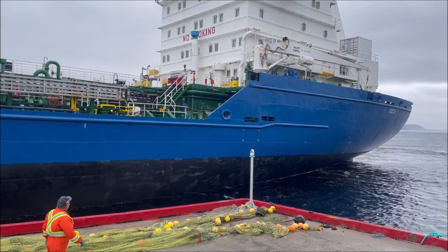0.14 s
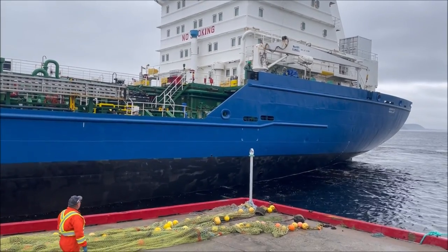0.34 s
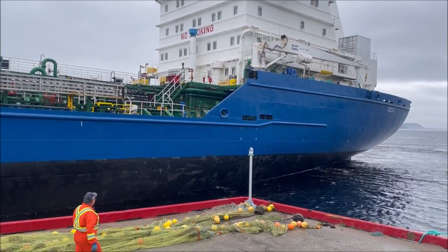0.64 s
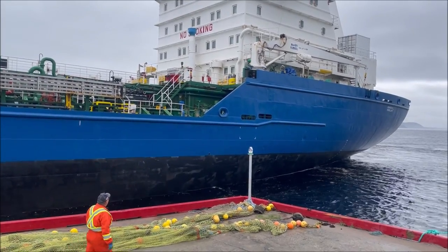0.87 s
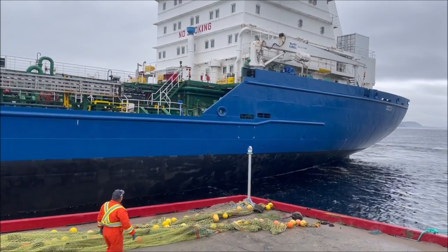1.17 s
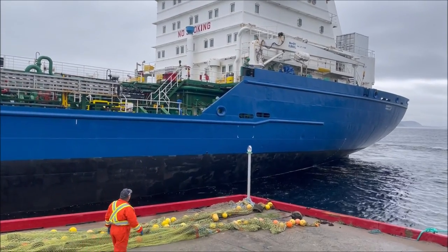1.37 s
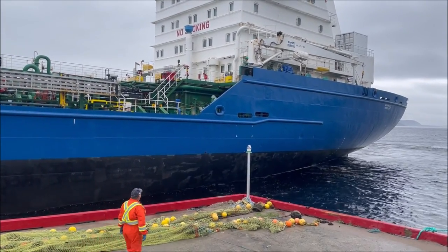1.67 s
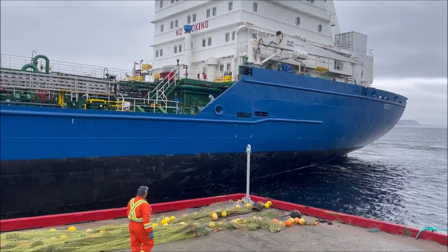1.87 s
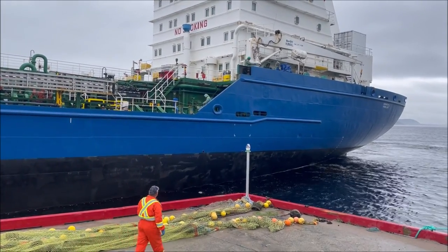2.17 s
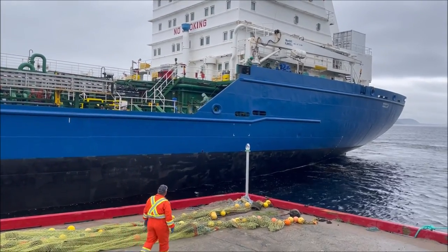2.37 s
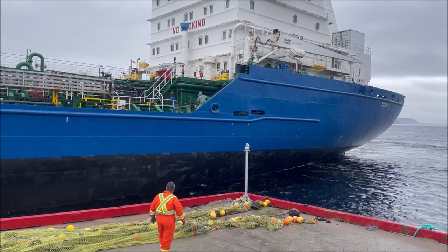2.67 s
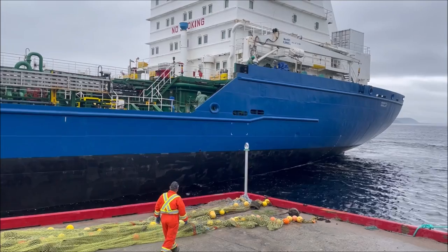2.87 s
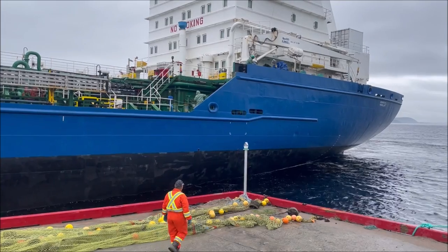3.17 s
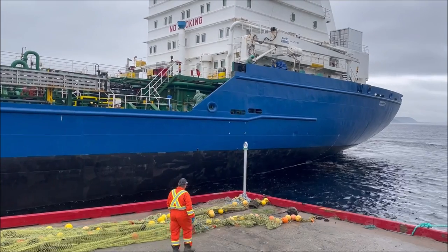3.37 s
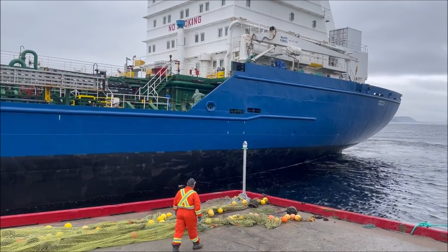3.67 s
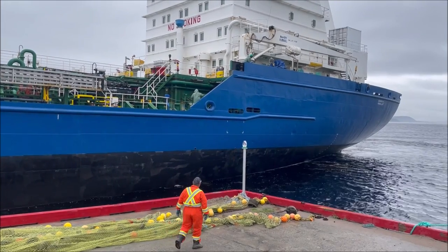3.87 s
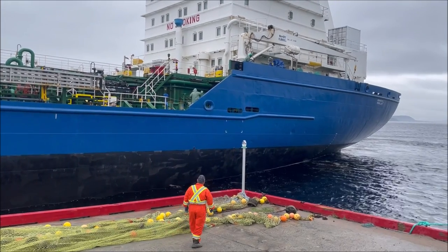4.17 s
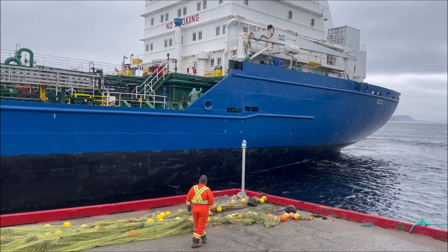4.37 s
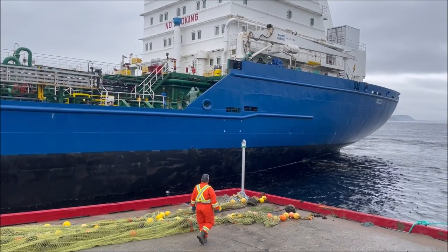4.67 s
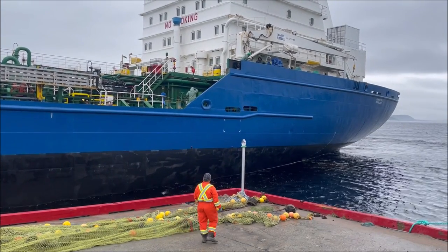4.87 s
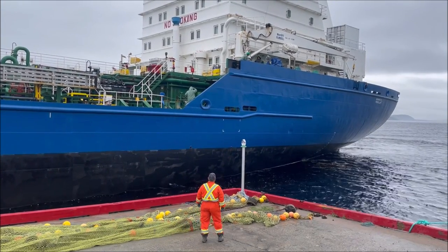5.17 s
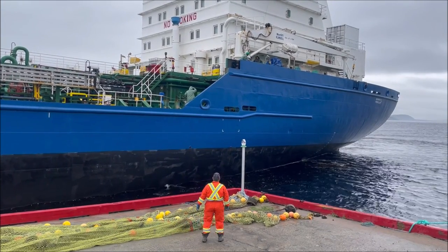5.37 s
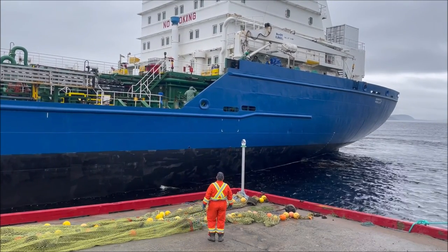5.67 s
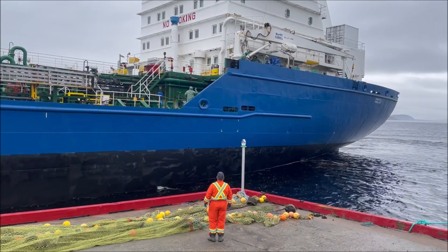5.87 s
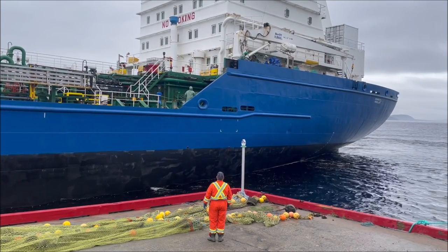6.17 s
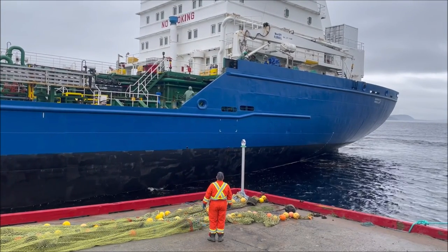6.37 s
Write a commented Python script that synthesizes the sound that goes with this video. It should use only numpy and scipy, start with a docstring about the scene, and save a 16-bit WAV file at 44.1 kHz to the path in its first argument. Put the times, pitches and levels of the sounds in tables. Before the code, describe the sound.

A tanker lying at a wharf drones without pause. A low diesel throb and deep exhaust rumble sit under a hollow, wavering boom from the ventilation shaft, broad fan roar and pump hums. A softer blower whirr, a faint fan whine and thin hiss lie on top. Small wind puffs thud at the stereo microphone, clearest just after the middle. Open air, no footsteps or voices.

```python
"""A four-stroke diesel throbs through the funnel of a tanker lying at a wharf, over a deep rumble of exhaust.
Engine-room fans boom in their trunking and roar from the louvres, while pumps hum and deck blowers whirr.
A thin hiss drifts on a light breeze, and puffs of wind buffet the two microphone ports.
Hums and notes are sine waves; moving air is coloured noise. Sound bouncing off hull, water and quay
reaches the ports by unequal paths, so the two sides differ in level, timing and likeness."""
import sys
import numpy as np
from scipy import signal
from scipy.fft import rfft, irfft, next_fast_len
from scipy.io import wavfile
from scipy.ndimage import uniform_filter1d, minimum_filter1d, map_coordinates

SR = 44100
rng = np.random.default_rng(int(sys.argv[2]) if len(sys.argv) > 2 else 0)


def wav_record(signal):
    """Record a signal, one row per channel, as 16-bit PCM in the file named by sys.argv[1]."""
    frames = np.transpose(np.atleast_2d(signal))
    bounded = np.clip(frames, -1, 1)
    # unit amplitude maps onto the largest positive 16-bit level
    quanta = np.round(bounded * 32767).astype(np.int16)
    wavfile.write(sys.argv[1], SR, quanta)


N = 287532

CYCLE_HZ = 6.043  # working cycles of the diesel a second, two shaft turns each

# How the diesel and its exhaust rise and fall. Each row: time in seconds, change of level in dB.
ENGINE_LOAD = [(0, -0.65), (.8, 0.38), (1.3, -1.9), (2.3, 0.27), (3.3, 0.77), (3.7, -0.13), (5.2, 0.064),
               (6.5, 0.81)]


def amp(db):
    """Turn decibels into a plain gain."""
    return 10 ** (np.asarray(db) / 20)


def along(points, hz):
    """Read a value at any frequency from (Hz, value) points, with frequency on a log axis."""
    f, v = np.transpose(points)
    return np.interp(np.log(hz + 1), np.log(f + 1), v)


def curve(rows):
    """Join (seconds, value) points by straight lines, giving one value per sample."""
    return np.interp(np.arange(N) / SR, *np.transpose(rows))


def wobble(rate):
    """Draw a smooth random curve through `rate` random points a second."""
    knots = rng.standard_normal(int(N * rate / SR) + 4)
    return map_coordinates(knots, [np.arange(N) * rate / SR])


def filtered(x, response):
    """Multiply the spectrum of x by a response, which may be complex and so also delay the sound."""
    m = next_fast_len(N + SR // 2)  # spare room keeps the end from wrapping onto the start
    spectrum = rfft(x, m) * response(np.fft.rfftfreq(m, 1 / SR))
    return irfft(spectrum, m)[..., :N]


def shape(points):
    """Make a gain over frequency from (Hz, dB) points."""
    return lambda hz: amp(along(points, hz))


def pipes(modes):
    """Turbulence feeds every air-column resonance separately, so their powers add; the skirts are steep."""
    def response(hz):
        power = 0
        for centre, width, db in modes:
            offset = (hz - centre) / (0.96 * width)
            power = power + amp(2 * db) / (1 + offset ** 2) ** 2
        return np.sqrt(power)
    return response


def air(density, patchy_db):
    """Moving air: two unrelated noises of joint rms 1, coloured by density, with shared loud and soft patches."""
    z = signal.stft(rng.standard_normal((2, N)), nperseg=512)[2]
    field = rng.standard_normal(z.shape[1:])
    field = uniform_filter1d(field, size=5, axis=0)  # spread over frequency
    field = uniform_filter1d(field, size=16, axis=1)  # spread over time
    patchy = z * amp(patchy_db * field / field.std())
    noise = signal.istft(patchy, nperseg=512)[1][:, :N]
    pair = filtered(noise, density)
    return pair / pair.std()


def tones(rows, waver, swell_db):
    """Steady sines, each wavering a little in phase and level on its way over the water."""
    t = np.arange(N) / SR
    total = np.zeros(N)
    for hz, db in rows:
        level = np.sqrt(2) * amp(db + swell_db * wobble(.8))  # root 2 turns rms into peak height
        phase = 2 * np.pi * (hz * t + rng.random()) + waver * wobble(.8)
        total += level * np.sin(phase)
    return total


def note(rows, waver, beads_db):
    """A tone that follows its pitch and level curves, unsteady in phase and beaded in level."""
    s, hz, db = np.transpose(rows)
    turns = np.cumsum(curve(np.c_[s, hz])) / SR
    level = np.sqrt(2) * amp(curve(np.c_[s, db]) + beads_db * wobble(9))
    return level * np.sin(2 * np.pi * turns + waver * wobble(6))


def wind():
    """Puffs of wind buffet each port on its own, in quick lumps of low noise."""
    # Colour of the buffeting. Each row: frequency in Hz, relative level in dB.
    buffet = [(10, -50), (20, -24), (40, -9), (60, -3), (110, 0), (170, -4), (260, -9), (340, -16),
              (500, -24), (1200, -80), (3000, -140)]
    # Puffs of wind. Each row: start in seconds, length in seconds, level in dB before the lumps.
    puffs = [(0.097, 0.058, -44.5), (1.6, .35, -37), (2.12, .3, -41), (2.444, 0.15, -40.5),
             (3.259, 0.56, -32), (4.036, 0.037, -30.5), (4.409, 0.33, -35), (4.937, 0.13, -35),
             (5.386, 0.25, -38), (6.096, 0.27, -36)]
    force = np.full(N, amp(-47))  # the breeze between puffs
    for start, length, db in puffs:
        force[round(start * SR):round((start + length) * SR)] = amp(db)
    force = uniform_filter1d(force, size=900)  # soften the edges over 20 ms
    lumps = amp(5.2 * np.array([wobble(22), wobble(22)]))
    return force * lumps / lumps.mean() * air(shape(buffet), patchy_db=0.0)


def thin_hiss():
    """A thin, steady hiss of air, joined by an upper hiss in narrow bands that swells on its own."""
    # Colour of the hiss. Each row: frequency in Hz, relative level in dB.
    hiss_colour = [(2000, -120), (3000, -96), (3200, -86.5), (3370, -91.5), (3480, -88), (3650, -92),
                   (4400, -94.5), (4750, -94.5), (5550, -99), (6200, -101), (7000, -111), (7450, -115),
                   (7700, -119), (8200, -130), (8900, -134), (10400, -133), (11200, -140), (12400, -145)]
    # Loudness of the hiss. Each row: time in seconds, rms level in dB.
    hiss_level = [(0, -59), (1.8, -59.5), (3.5, -58.5), (4.6, -59), (5.6, -57.5), (6.5, -59)]
    # Bands of the upper hiss. Each row: centre in Hz, width in Hz before scaling, relative level in dB.
    upper_bands = [(3760, 63, 0.5), (4065, 140, -3), (4360, 130, -3.5)]
    # Loudness of the upper hiss. Each row: time in seconds, rms level in dB.
    upper_level = [(0, -64.5), (1.0, -62.5), (1.85, -59), (2.1, -63.5), (2.68, -67.5), (2.82, -61.5),
                   (3.5, -60.5), (4.2, -59), (4.45, -66.5), (5.2, -63), (5.7, -63.5), (6.1, -60),
                   (6.5, -62.5)]
    steady = amp(curve(hiss_level)) * air(shape(hiss_colour), patchy_db=1.5)
    upper = amp(curve(upper_level)) * air(pipes(upper_bands), patchy_db=1.9)
    return steady + upper


def deck_blowers():
    """Deck blowers whirr: bright noise whose level the moving air sways a little."""
    # Colour of the whirr. Each row: frequency in Hz, relative level in dB.
    blower_colour = [(700, -130), (1150, -85), (1300, -71), (1360, -68.5), (1387, -65.5), (1415, -69.5),
                     (1460, -71.5), (1650, -71), (1750, -76.5), (1850, -72.5), (2050, -80), (2450, -77.5),
                     (2750, -82), (3050, -90.5), (3600, -140)]
    # Loudness of the whirr. Each row: time in seconds, level in dB before the sway.
    blower_level = [(0, -42), (1.0, -41.5), (1.8, -41.5), (2.5, -43), (3.2, -41), (3.9, -40.5),
                    (4.6, -41.5), (5.2, -41), (5.8, -42), (6.5, -41.5)]
    level = amp(curve(blower_level) + 0.26 * wobble(8.5))
    return level * air(shape(blower_colour), patchy_db=0.98)


def fan_whine():
    """A fan's blade note, drifting slowly in pitch."""
    # Path of the note. Each row: time in seconds, pitch in Hz, level in dB before the beading.
    whine_path = [(0, 900, -53.5), (1.2, 903.4, -52), (2.75, 912.4, -51), (4.2, 908.7, -51),
                  (5.4, 905.4, -49), (6.5, 898, -51)]
    return note(whine_path, waver=.7, beads_db=1.0)


def pump_hums():
    """Pumps add steady hums of their own."""
    # Hums of the pumps. Each row: frequency in Hz, level in dB before the swell.
    pump_tones = [(70.66, -48), (101.02, -39), (196.7, -47), (344.7, -54), (362.6, -59), (897.5, -55),
                  (1899.2, -68)]
    return tones(pump_tones, waver=0.34, swell_db=1.5)


def fan_roar():
    """Engine-room fans roar from the louvres as broad noise, with the resonances of the air trunking added."""
    # Broad colour of the fans. Each row: frequency in Hz, relative level in dB.
    fan_colour = [(100, -100), (200, -85), (340, -63), (600, -62), (1000, -63), (1100, -65), (1200, -75),
                  (1400, -90), (2000, -140)]
    # Resonances of the trunking. Each row: centre in Hz, width in Hz before scaling, relative level in dB.
    trunk_modes = [(273, 11, -55.5), (298.1, 11, -53), (404.7, 4.6, -60), (431.8, 11, -56.5),
                   (453.7, 7.8, -57.5), (474, 8.8, -61), (509, 8.3, -54), (516, 9, -56.5), (535, 18, -62.5),
                   (645.4, 18, -58.5), (680, 8.6, -62.5), (708, 12, -60.5), (748, 45, -61),
                   (897.6, 13, -58.5), (911, 11, -61)]
    # Loudness of the roar. Each row: time in seconds, level in dB before the sway.
    roar_level = [(0, -31.5), (1.5, -31.5), (2.6, -32), (3.6, -31), (4.7, -30.5), (5.8, -31), (6.5, -32.5)]
    fans, trunk = shape(fan_colour), pipes(trunk_modes)
    level = amp(curve(roar_level) + 0.27 * wobble(4.3))
    return level * air(lambda hz: np.hypot(fans(hz), trunk(hz)), patchy_db=0.8)


def shaft_boom():
    """Turbulence makes the air column of the intake shaft resonate, the loudest boom."""
    # Resonances of the shaft. Each row: centre in Hz, width in Hz before scaling, relative level in dB.
    shaft_modes = [(203.8, 7, -5), (213.8, 9, -3), (223.9, 7.1, -2.5), (240.5, 9.3, -7),
                   (246.8, 8.2, -12.5)]
    # Loudness of the boom. Each row: time in seconds, level in dB before the sway.
    boom_level = [(0, -31), (.45, -31), (.9, -27.5), (1.5, -34), (2.0, -29.5), (2.6, -29.5), (3.2, -31.5),
                  (3.5, -25.5), (3.75, -32), (4.2, -27), (4.5, -30), (4.8, -27), (5.3, -27.5), (5.9, -27),
                  (6.5, -30.5)]
    level = amp(curve(boom_level) + 0.58 * wobble(5))
    return level * air(pipes(shaft_modes), patchy_db=1.26)


def shaft_drone():
    """The intake shaft's strongest note, a tone that wanders in pitch."""
    # Path of the note. Each row: time in seconds, pitch in Hz, level in dB before the beading.
    drone_path = [(0, 218, -41), (.9, 218.4, -35), (1.6, 213.9, -42), (2.3, 222.2, -36), (3.3, 220.9, -35),
                  (3.8, 221.8, -42), (4.6, 223.8, -36), (5.3, 223, -34), (6.1, 219.8, -35),
                  (6.5, 216, -39.5)]
    return note(drone_path, waver=1.1, beads_db=3.0)


def exhaust_rumble():
    """Exhaust rumbles as deep noise that pulses gently with the firing of the cylinders."""
    # Colour of the rumble. Each row: frequency in Hz, relative level in dB.
    rumble_colour = [(12, -93), (20, -73.5), (32, -61.5), (45, -53.5), (60, -49.5), (72, -51), (85, -48.5),
                     (105, -53), (145, -54.5), (188, -57), (260, -68.5), (400, -102), (800, -140)]
    # five cylinders fire in each cycle
    firing = np.cos(2 * np.pi * 5 * CYCLE_HZ * np.arange(N) / SR)
    level_db = -29.5 + curve(ENGINE_LOAD) + 0.64 * firing + 0.45 * wobble(2.9)
    return amp(level_db) * air(shape(rumble_colour), patchy_db=1.5)


def diesel_throb():
    """Uneven cylinders put a tone on many multiples of the working cycle; together they throb."""
    # Tones of the diesel. Each row: multiple of the cycle, level in dB before the load and the swell.
    diesel_tones = [(5, -58), (7, -52), (10, -40), (11, -48), (13, -48), (15, -42.5), (16, -34),
                    (17, -44.5), (18, -44), (19, -39), (20, -40.5), (21, -37.5), (22, -40), (23, -47.5),
                    (26, -50)]
    rows = [(k * CYCLE_HZ, db) for k, db in diesel_tones]
    return amp(curve(ENGINE_LOAD)) * tones(rows, waver=0.6, swell_db=2.2)


def ports(common, scattered):
    """Each port hears its own mix of direct and bounced sound, with half the level tilt and half the lag."""
    # What the ports hear. Each row: frequency in Hz, left minus right level in dB,
    # likeness of the two sides from 0 to 1, phase in radians by which left lags.
    paths = np.array([(80, -.5, 0.98, 0), (250, -0.56, 0.97, 0.13), (490, -0.4, 0.95, 0.22),
                      (875, 5, .88, 1.01), (1085, 5, 0.83, 3), (1155, 0.5, 0.7, 3), (1423, -1, 0.8, 6.5),
                      (1845, 1.5, 0.7, 8), (2160, 4.5, 0.7, 11), (2380, -3, 0.6, 11.5),
                      (2890, -0.5, 0.9, 13), (3110, 1, 0.04, 16.5), (3750, 1.5, 0.6, 19.5),
                      (4520, 0.3, 0.5, 19.5), (4940, 1, 0.2, 22), (5840, 1.5, 0.1, 23.5),
                      (7540, 1, 0.2, 23), (8360, 1, 0.2, 27)])
    tilt_db, alike, lag = [paths[:, [0, k]] for k in (1, 2, 3)]

    def blend(hz):
        turn = np.arccos(np.clip(along(alike, hz), 0, 1)) / 2
        return np.array([np.cos(turn), np.sin(turn)])

    def left_and_right(hz):
        half = amp(along(tilt_db, hz) / 2) * np.exp(-.5j * along(lag, hz))
        return np.array([half, 1 / half])

    mid, side = filtered(np.array([common, scattered]), blend)
    return filtered(np.array([mid + side, mid - side]), left_and_right)


def scene():
    """Add up the machinery, carry it to the two ports and let the wind buffet them."""
    breeze = wind()
    common, scattered = thin_hiss() + deck_blowers() + fan_roar() + shaft_boom() + exhaust_rumble()
    steady_tones = fan_whine() + pump_hums() + shaft_drone() + diesel_throb()
    return ports(common + steady_tones, scattered) + breeze


def record(dry):
    """The recorder limits the peaks, mirrors the bass faintly in the treble and cuts all above its band limit."""
    # The bass shows on both sides of the clock frequency. Each row: bass frequency in Hz, gain in dB.
    mirror_gain = [(20, -97), (60, -78), (110, -71.5), (230, -69), (300, -75), (420, -100), (600, -140)]
    ceiling, clock_hz, top_hz = .3, 12000, 12400  # the ceiling holds before the mirror and the band limit
    hold = round(.012 * SR)  # 12 ms in samples
    peak = np.abs(dry).max(0)
    need = minimum_filter1d(np.minimum(1, ceiling / (peak + 1e-9)), size=2 * hold)
    gain = uniform_filter1d(uniform_filter1d(need, size=hold // 2), size=hold // 2)
    held = dry * gain
    clock = 2 * np.cos(2 * np.pi * clock_hz * np.arange(N) / SR)
    mirror = filtered(held.mean(0), shape(mirror_gain)) * clock
    return filtered(held + mirror, lambda hz: hz < top_hz)


dry = scene()
out = record(dry)
wav_record(out)
```